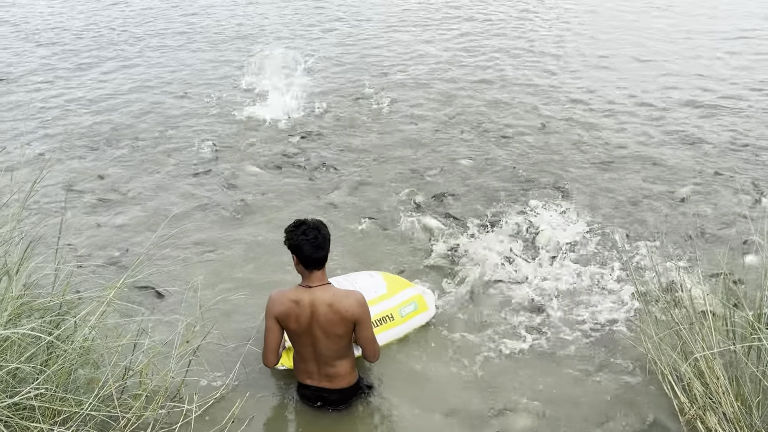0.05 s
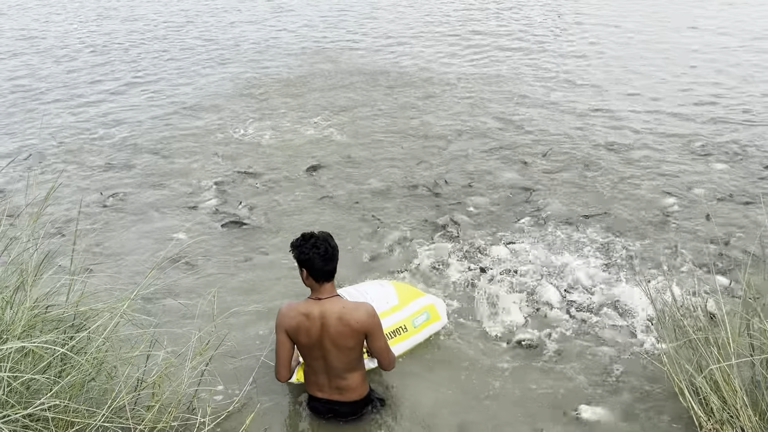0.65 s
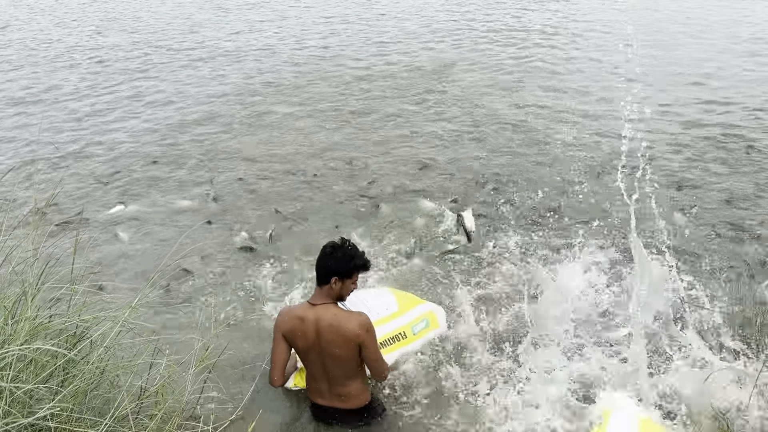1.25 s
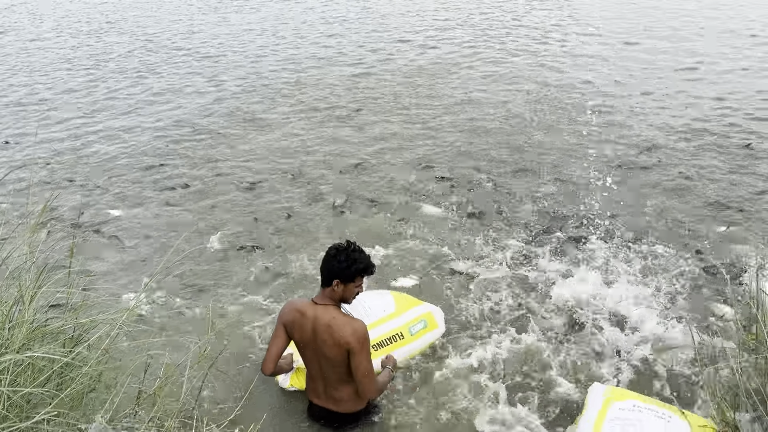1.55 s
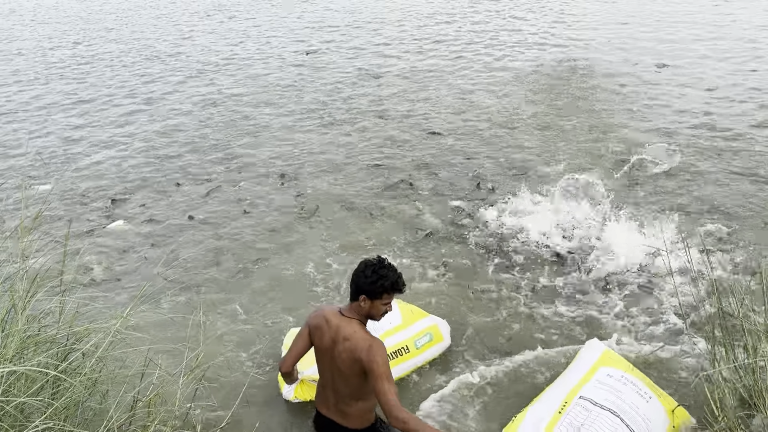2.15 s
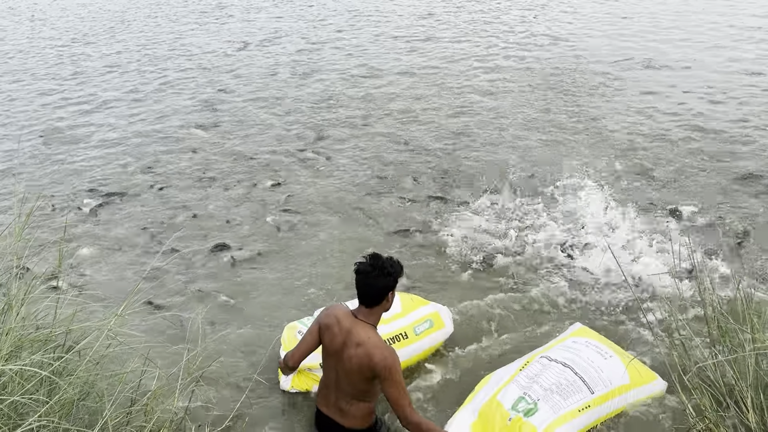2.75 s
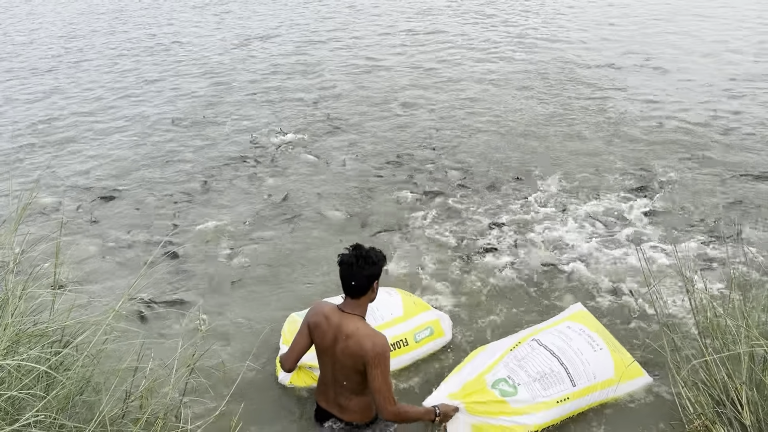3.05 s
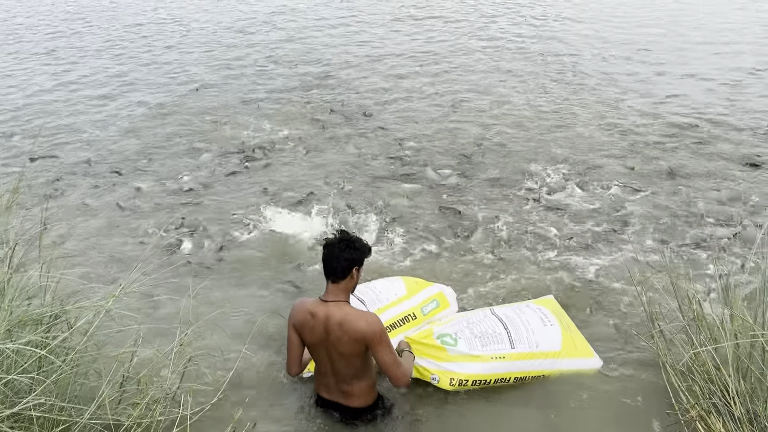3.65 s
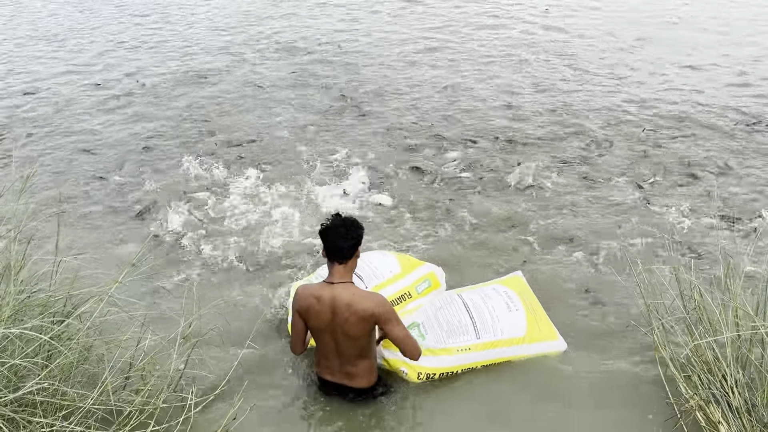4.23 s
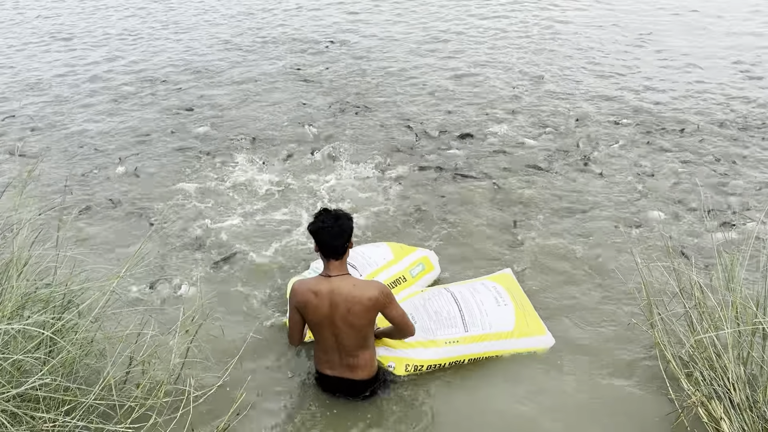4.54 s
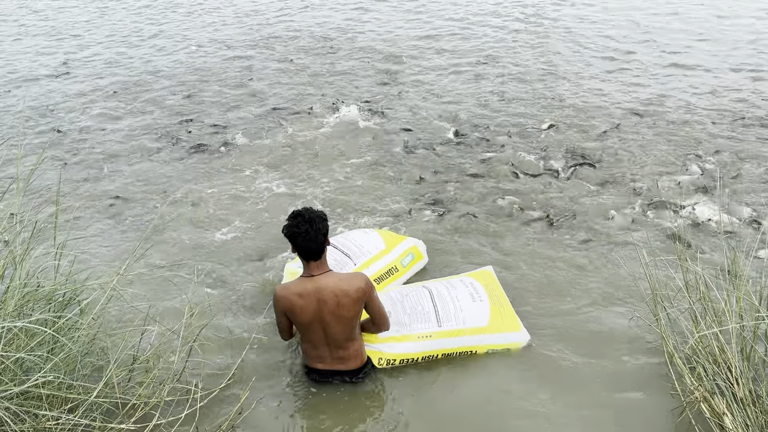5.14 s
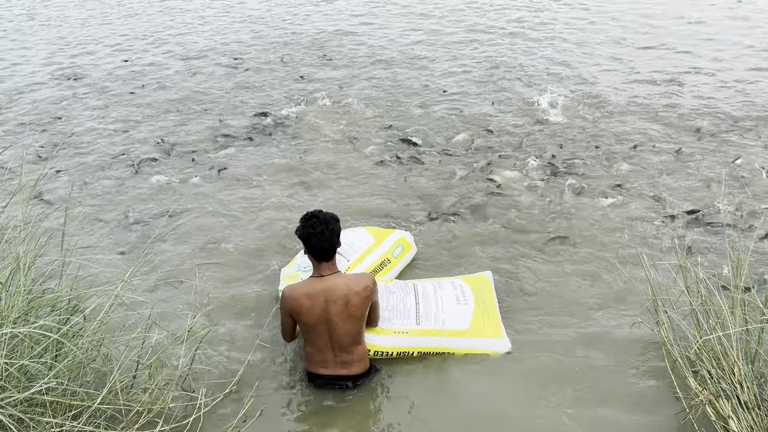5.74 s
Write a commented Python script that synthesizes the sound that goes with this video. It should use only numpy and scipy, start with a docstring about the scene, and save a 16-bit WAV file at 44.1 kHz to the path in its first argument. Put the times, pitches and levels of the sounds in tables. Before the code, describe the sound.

Heard from a riverbank, water seethes steadily as many big fish feed nearby. A heavy sack splashes in near the start, the water gulping back while spray patters down. Bursts of thrashing follow, with tails thudding below and bodies smacking on top. Toward the end the churning softens, leaving scattered small slaps, single bubbles and close drips.

```python
"""Fish thrashing at a feed

A shoal of big fish churns the surface of a river, a few metres from the bank. Tails thud below,
bodies slap on top, trapped air rings as bubbles and drops tick all around. A feed sack lands with
a whump and its spray rains down; the fish thrash in bouts, then the feeding eases off."""
import sys
import numpy as np
from scipy import signal
from scipy.fft import rfft, irfft, next_fast_len
from scipy.io import wavfile
from scipy.ndimage import uniform_filter1d

SR = 44100
rng = np.random.default_rng(int(sys.argv[2]) if len(sys.argv) > 2 else 0)


def generate_wav(sig):
    """Save sig (samples, or channels by samples) to the path in sys.argv[1] as 16-bit PCM at SR."""
    pcm = np.round(np.clip(np.atleast_2d(sig).T, -1, 1) * 32767).astype(np.int16)
    wavfile.write(sys.argv[1], SR, pcm)


N = 264159
TIME = np.arange(N) / SR
EARS = np.array([[1], [-1]])  # left, right


def from_db(db):
    """Decibels to gain."""
    return 10 ** (np.asarray(db) / 20)


def to_db(power):
    """Power to decibels."""
    return 10 * np.log10(power + 1e-12)


def rms_one(x):
    """Scale to unit power."""
    return x / np.sqrt(np.mean(x ** 2) + 1e-20)


def peak_one(x):
    """Scale to unit peak."""
    return x / np.abs(x).max()


def at_hz(points, hz):
    """Read a table on a log-frequency axis."""
    knots, values = np.transpose(points)
    return np.interp(np.log(hz + 1e-3), np.log(knots), values)


def filtered(x, response):
    """Apply a frequency response given as a function of Hz."""
    size = next_fast_len(N + 4096)
    hz = np.arange(size // 2 + 1) * SR / size
    return irfft(rfft(x, size) * response(hz), size)[..., :N]


def drift(rate_hz):
    """Smooth random wander, unit spread."""
    step, settle = 40, 2000
    pole = np.exp(-2 * np.pi * rate_hz * step / SR)
    noise = rng.standard_normal(N // step + settle + 2)
    slow = signal.lfilter([1], [1, -2 * pole, pole * pole], noise)[settle:]
    return np.interp(np.arange(N) / step, np.arange(len(slow)), rms_one(slow))


def resonance(x, hz, width_hz):
    """Two-pole band-pass, unity peak gain."""
    radius = np.exp(-np.pi * width_hz / SR)
    angle = 2 * np.pi * min(hz, SR / 2) / SR
    feed = np.array([1, 0, -1]) * (1 - radius ** 2) / 2
    return signal.lfilter(feed, [1, -2 * radius * np.cos(angle), radius ** 2], x + 1e-18)


def add(out, start_s, sound):
    """Mix a short sound in."""
    start = int(np.clip(round(start_s * SR), 0, N - 1))
    out[..., start:start + sound.shape[-1]] += sound[..., :N - start]


def spell(start_s, end_s, level_db, rise_s, fall_db_per_s):
    """Power envelope: builds up to start_s, holds until end_s, dies away."""
    build = np.clip(1 + (TIME - start_s) / rise_s, 0, 1)
    return (build * from_db(level_db - fall_db_per_s * np.maximum(TIME - end_s, 0))) ** 2


def splashing(start_s, end_s, churn_db, spray_db, rise_s, fall_db_per_s):
    """Churn and spray power of one spell of splashing."""
    return np.array([spell(start_s, end_s, db, rise_s, fall_db_per_s) for db in (churn_db, spray_db)])


# Knots of fish thrashing together: start_s, end_s, churn_db, spray_db, rise_s
BOUTS = [(0.0, 0.13, -35, -52, .1), (2.3, 2.56, -34.5, -42.5, .63), (3.7, 4.13, -35.5, -49.5, .2)]
# One fish beating its tail: start_s, churn_db, spray_db
FLURRIES = [(0.35, -43, -47), (0.86, -32, -60), (2.33, -41, -45), (2.669, -51, -43.5), (2.89, -39, -61),
            (3.2, -40, -51), (3.41, -42, -60), (4.01, -45, -44)]


def feeding():
    """Churn and spray power: the shoal slowly loses interest, with bouts and flurries on top."""
    steady = from_db([-40 - 0.78 * TIME, -43.5 - 1.75 * TIME]) ** 2
    bouts = sum(splashing(*bout, fall_db_per_s=16.5) for bout in BOUTS)
    flurries = sum(splashing(start_s, start_s + 0.036, *levels_db, rise_s=0.016, fall_db_per_s=192.5)
                   for start_s, *levels_db in FLURRIES)
    return steady + bouts + flurries


# Holes torn by fish or sack: start_s, end_s, level_db
REFILLS = [(0.03, 0.21, -39), (0.908, 1.515, -27.5), (2.55, 2.576, -37)]


def refilling(sag_db_per_s=12):
    """Gulp power of holes in the water filling."""
    return sum(spell(start_s, end_s, db - sag_db_per_s * (TIME - start_s), rise_s=0.21, fall_db_per_s=127)
               for start_s, end_s, db in REFILLS)


# Deep heaves: start_s, end_s, level_db
HEAVES = [(0.188, 0.544, -41.5), (0.978, 1.462, -35), (2.03, 2.49, -34.5), (2.782, 3.0, -46.5),
          (4.36, 4.506, -36.5)]


def heaving(rest_db=-56):
    """Surge power of water heaving deep down."""
    return from_db(rest_db) ** 2 + sum(spell(*heave, rise_s=0.41, fall_db_per_s=45) for heave in HEAVES)


def bubble(hz, cycles, rise):
    """Trapped air rings, its pitch climbing by the fraction rise as it surfaces; peak 1."""
    age = np.linspace(0, 1, max(int(cycles / hz * SR), 8))
    ring = np.sin(2 * np.pi * cycles * (age + rise * age ** 2 / 2))
    onset = (1 - np.exp(-age * cycles)) ** 2
    return peak_one(ring * from_db(-60 * age) * onset)


def bubbling(low_hz, high_hz, pitches, per_s, cycles, rise, size_db, clump_db, lag_s, busy_db=0):
    """Bubbles born in clumps, more in busy water, each from its own direction; unit power."""
    out = np.zeros((2, N))
    births = from_db(clump_db * drift(18) + busy_db)
    born_so_far = np.cumsum(births) / births.sum()
    per_pitch = max(int(per_s * N / SR / pitches), 2)
    for hz in np.geomspace(low_hz, high_hz, pitches):
        when, size, side, sign = rng.random((4000, 4))[:per_pitch].T
        strength = from_db(size_db * np.minimum(-np.log(1 - size), 3.5)) * np.sign(sign - .5)
        rings = np.outer(strength, bubble(hz, cycles, rise))
        rings *= np.sqrt(hz / np.sum(rings ** 2))  # flat spectrum
        starts = np.searchsorted(born_so_far, when)
        lags = np.round((side - .5) * lag_s * SR).astype(int)
        for ear, arrivals in enumerate(np.abs(starts + EARS * lags)):
            samples = arrivals[:, None] + np.arange(rings.shape[1])
            out[ear] += np.bincount(samples.ravel(), rings.ravel(), N)[:N]
    return rms_one(out)


def water(bubbles, spectrum, wash_db, flutter_db, width):
    """Single bubbles over the wash of countless smaller ones, levelled to unit power."""
    colour = lambda hz: from_db(at_hz(spectrum, hz))
    wash = filtered(rng.standard_normal(N) + width * rng.standard_normal((2, N)), colour)
    wash *= from_db(flutter_db * drift(22.4))
    mix = rms_one(filtered(bubbles, colour)) + from_db(wash_db) * rms_one(wash)
    power = uniform_filter1d(np.mean(mix ** 2, axis=0), SR // 7)
    return mix / np.sqrt(power + 1e-9)


# Water spectra: frequency_hz, density_db
SURGE_SPECTRUM = [(22, -22), (42, -4.5), (65, 2.5), (110, -2.5), (170, -8.5), (300, -25.5), (600, -65)]
GULP_SPECTRUM = [(90, -16), (170, -1), (240, 2), (340, 1.5), (480, -0.5), (900, -20)]
CHURN_SPECTRUM = [(200, -33), (380, -11), (550, -2.5), (850, -1), (1100, -5), (1350, -2.5), (1600, -10.5),
                  (1950, -8), (2600, -10), (3200, -16), (5000, -25), (12000, -31)]
SPRAY_SPECTRUM = [(700, 1), (2000, 2), (3200, -2), (4300, 0), (5300, 0), (7500, -6.5), (11000, -3.5),
                  (15800, -9)]


def shoal(surge_db, gulp_db, churn_db, spray_db, calm_db=-42):
    """Tail strokes heave the water, cavities gulp, the surface churns and spray patters back."""
    busy_db = churn_db - calm_db
    surge = bubbling(40, 200, pitches=10, per_s=80, cycles=6, rise=0,
                     size_db=2.4, clump_db=2.6, lag_s=.003)
    gulp = bubbling(158.8, 533, pitches=12, per_s=300, cycles=13.4, rise=.11,
                    size_db=2, clump_db=2, lag_s=.0004)
    churn = bubbling(350, 4500, pitches=48, per_s=1600, cycles=22, rise=.15,
                     size_db=3.8, clump_db=2.5, lag_s=.00025, busy_db=.6 * busy_db)
    spray = bubbling(1800, 15500, pitches=14, per_s=3000, cycles=5, rise=0,
                     size_db=4.2, clump_db=2.2, lag_s=.00001)
    surge = water(surge, SURGE_SPECTRUM, wash_db=-6, flutter_db=2.6, width=.25)
    gulp = water(gulp, GULP_SPECTRUM, wash_db=-4, flutter_db=2.5, width=.15)
    churn = water(churn, CHURN_SPECTRUM, wash_db=.28 * busy_db - 4, flutter_db=2, width=.25)
    spray = water(spray, SPRAY_SPECTRUM, wash_db=3, flutter_db=1, width=.6)
    low_gain = from_db(0.35 * (churn_db + 43.5))  # harder thrashing traps larger bubbles
    churn += (low_gain - 1) * resonance(churn, 440, 280)
    return (from_db(surge_db + 5.5) * surge + from_db(gulp_db) * gulp
            + from_db(churn_db) * churn + from_db(spray_db + 3.5) * spray)


def drops(spray_db, per_s=16, spread_db=22):
    """Single drops land close by and tick above the spray."""
    lands = rng.random(N) < per_s / SR
    clicks = lands * from_db(spray_db + 31 - spread_db * rng.random(N))
    return resonance(clicks, 7800, 4900) + .5 * resonance(clicks, 5700, 1000)


def plops(churn_db, per_s=16, follow=0.43, spread_db=34):
    """Larger bubbles only partly follow the churn level, so they stand out as it calms."""
    out = np.zeros((2, N))
    for when, pitch, faintness, side in rng.random((400, 4))[:int(per_s * N / SR)]:
        level_db = follow * churn_db[int(when * N)] - 20 - spread_db * faintness
        pan_db = 6 * (side - .5) * EARS
        ring = bubble(600 * 2 ** (2 * pitch), cycles=22, rise=.42)
        add(out, when * N / SR, from_db(level_db + pan_db) * ring)
    return out


def cavity(first_hz, last_hz, swell_s, t60_s, glide_s):
    """An air pocket forced under water grows, so its note falls; peak 1."""
    t = TIME[:SR // 4]
    hz = last_hz + (first_hz - last_hz) * np.exp(-t / glide_s)
    envelope = (1 - np.exp(-t / swell_s)) ** 2 * from_db(-60 * t / t60_s)
    return peak_one(np.sin(2 * np.pi * np.cumsum(hz) / SR) * envelope)


# Large air pockets closing under water: start_s, peak_db, nominal_pitch_hz
THUDS = [(0.242, -20.5, 117), (0.982, -19, 110), (1.02, -17, 69.5), (1.123, -15.5, 74.4), (1.306, -14, 102),
         (1.344, -19.5, 95), (1.877, -18.5, 111), (2.208, -21, 100), (2.282, -18.5, 108), (2.471, -17, 104),
         (2.538, -23.5, 230), (4.322, -17, 109), (4.346, -25, 114), (4.378, -23, 136), (4.449, -22, 96),
         (4.623, -18.5, 88.5), (5.694, -28, 224)]


def tail_thuds():
    """A hard tail stroke drives air under water; the pocket throbs for two or three cycles."""
    out = np.zeros(N)
    for start_s, peak_db, hz in THUDS:
        throb = cavity(2.11 * hz, 0.41 * hz, swell_s=1.24 / hz, t60_s=4.4 / hz, glide_s=0.9 / hz)
        add(out, start_s, from_db(peak_db) * throb)
    return out


def splat(hz, width_hz, t60_s, swell_s):
    """A sheet of water breaks: a puff of noise around one pitch, mostly alike in both ears; peak 1."""
    t = TIME[:SR // 6]
    noise = rng.standard_normal(len(t)) + .35 * rng.standard_normal((2, len(t)))
    puff = noise * from_db(-60 * t / t60_s) * (1 - np.exp(-t / swell_s))
    return peak_one(resonance(resonance(puff, hz, width_hz), hz, width_hz))


# Water hitting water: start_s, level_db, pitch_hz, sizzle_re_crack_db
SMACKS = [(0.3585, -20.5, 1960, -5), (0.6853, -10, 3500, -5.5), (0.81, -22, 2900, -1),
          (0.932, -22, 4200, -3), (1.7, -12.5, 3560, -17), (2.68, -29, 4300, -17),
          (3.571, -30.5, 3380, -14), (3.7194, -27.5, 3070, -6), (3.769, -34, 3400, -12),
          (4.7152, -27, 6900, -2), (5.0615, -32, 3540, -18), (5.148, -31.5, 3960, -14),
          (5.332, -34.5, 7000, 0), (5.924, -31, 2290, -10)]


def water_smacks():
    """Thrown water lands with a crack and a sizzle of droplets, then fizzes a moment longer."""
    out = np.zeros((2, N))
    for start_s, level_db, hz, sizzle_db in SMACKS:
        crack = splat(hz, 1.15 * hz, t60_s=.015, swell_s=.0003)
        sizzle = from_db(sizzle_db) * splat(10500, 9000, t60_s=.015, swell_s=.0003)
        fizz = from_db(-11) * splat(hz, hz, t60_s=.066, swell_s=.0011)
        add(out, start_s, from_db(level_db + 4) * peak_one(crack + sizzle + fizz))
    return out


# Fish or sack hitting the surface: start_s, level_db, air_pitch_hz
SLAPS = [(0.36, -15, 605), (0.682, -8.5, 670), (0.802, -13.5, 520), (1.114, -20, 795), (1.298, -14, 652),
         (2.35, -22, 640), (3.5803, -22, 653), (3.6355, -19.5, 1270), (3.656, -28.5, 573),
         (3.861, -22.5, 760), (4.032, -24.5, 1620), (4.717, -30, 1140), (4.903, -24.5, 1450),
         (5.391, -30.5, 990), (5.563, -28.5, 930), (5.924, -29.5, 1288)]


def surface_slaps():
    """A fish or the sack slaps the surface; trapped air knocks, then breaks into smaller bubbles."""
    out = np.zeros((2, N))
    for start_s, level_db, hz in SLAPS:
        add(out, start_s, from_db(level_db - 4) * splat(hz, 1.3 * hz, t60_s=.055, swell_s=.0009))
        add(out, start_s, from_db(level_db - 2.5) * bubble(hz, cycles=11, rise=.15))
        for late, pitch in rng.random((4, 2)):
            fragment = bubble(hz * 2 ** (1.6 * (pitch - .55)), cycles=19, rise=.3)
            add(out, start_s + .066 * late, from_db(level_db - 11 - 14 * late) * fragment)
    return out


# Single bubbles, deep gulps to small plips: start_s, level_db, first_hz, glide_octaves
LOUD_BUBBLES = [(0.368, -27, 419, -0.31), (0.597, -30, 1025, -0.24), (0.634, -35, 1290, 0),
                (0.858, -24, 397, -0.047), (0.885, -21.5, 288, -0.1), (0.95, -22, 395, -0.32),
                (1.536, -21, 345, -0.18), (3.417, -26, 735, -0.27), (4.042, -30, 560, -.1),
                (4.307, -22.5, 211, 0.22), (4.809, -38, 543, -0.36), (4.929, -37.5, 693, 0.82),
                (5.002, -37, 556, -0.12), (5.125, -37, 542, 0.8), (5.329, -39.5, 477, .8),
                (5.594, -36, 432, 0.3), (5.737, -40.5, 885, -0.052), (5.802, -38.5, 1845, .2),
                (5.843, -38, 728, -0.27)]


def loud_bubbles(gurgle_db=2.5):
    """An air pocket's note climbs as it surfaces or sinks as it is dragged down; deforming, it gurgles."""
    out = np.zeros(N)
    for start_s, level_db, first_hz, octaves in LOUD_BUBBLES:
        length_s = 0.023 + 0.024 * abs(octaves)
        age = np.linspace(0, 1, int(length_s * SR))
        note = np.sin(2 * np.pi * np.cumsum(first_hz * 2 ** (octaves * age)) / SR)
        swell = np.sin(np.pi * age ** 0.6) ** 2
        add(out, start_s, from_db(level_db) * note * swell)
    return out * rms_one(from_db(gurgle_db * drift(160)))


# Landing, swell below, cavity closing: start_s, level_db, first_hz, last_hz, swell_s, t60_s
SACK = [(0.682, -7.5, 530, 220, 0.0027, 0.062), (0.7, -10.5, 97, 71.5, 0.0082, 0.054),
        (0.801, -11, 303, 230, 0.0065, 0.028)]


def sack():
    """The sack lands flat and punches a cavity; the torn water roars above its note."""
    out = np.zeros((2, N))
    for start_s, level_db, first_hz, last_hz, swell_s, t60_s in SACK:
        whump = cavity(first_hz, last_hz, swell_s, t60_s, glide_s=.0034)
        roar = splat(first_hz, 3 * first_hz, t60_s=.042, swell_s=.0029)
        add(out, start_s, from_db(level_db) * whump)
        add(out, start_s - .0015, from_db(level_db - 7.5) * roar)
    return out


def sack_splash(rise_s=0.00871):
    """Churn and spray power: the landing throws up a sheet of water, which rains back down."""
    thrown_s = SACK[0][0] + rise_s
    sheet = splashing(thrown_s, thrown_s + .08, churn_db=-29, spray_db=-33, rise_s=rise_s, fall_db_per_s=30)
    rain = splashing(1.28, 1.47, churn_db=-30.5, spray_db=-32, rise_s=.36, fall_db_per_s=20)
    return sheet + rain


def scene():
    """Fish and sack set the level of the seething water; single impacts and bubbles sound over it."""
    churn, spray = feeding() + sack_splash()
    surge = heaving()
    gulp = refilling() + churn * from_db(-8) ** 2 + surge * from_db(-11) ** 2
    surge_db, gulp_db, churn_db, spray_db = map(to_db, (surge, gulp, churn, spray))
    seething = shoal(surge_db, gulp_db, churn_db, spray_db)
    impacts = surface_slaps() + water_smacks() + tail_thuds() + sack()
    return seething + impacts + loud_bubbles() + drops(spray_db) + plops(churn_db)


# Microphone port balance: frequency_hz, left_minus_right_db
PORT_BALANCE = [(60, -.5), (380, -1), (700, -5), (1290, -6), (2380, -3.5), (8120, -0.5)]
# Microphone port phase: frequency_hz, left_lead_rad
PORT_PHASE = [(150, 0), (550, -.6), (1300, -.25), (2300, -.4), (2850, -1.7), (3500, .2), (5250, -.8),
              (5500, -4.3), (6300, -4.25), (8600, -2.1), (11200, -.1), (13600, .1), (16000, 2.1)]


def record(dry):
    """Two microphone ports differ in level and phase; the top is cut at 16 kHz."""
    def ports(hz):
        """Half of each difference goes to either side."""
        gain = from_db(EARS * at_hz(PORT_BALANCE, hz) / 2)
        gain /= np.sqrt(np.mean(gain ** 2, axis=0))
        return gain * np.exp(.5j * EARS * at_hz(PORT_PHASE, hz))
    low_pass = signal.ellip(10, .2, 80, 16000, fs=SR, output="sos")
    return signal.sosfilt(low_pass, filtered(dry, ports))


dry = scene()
out = record(dry)
generate_wav(out)
```